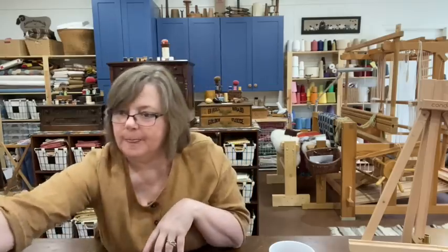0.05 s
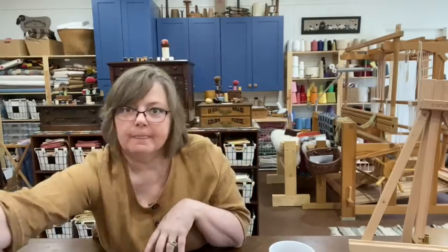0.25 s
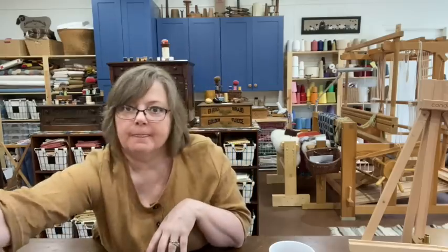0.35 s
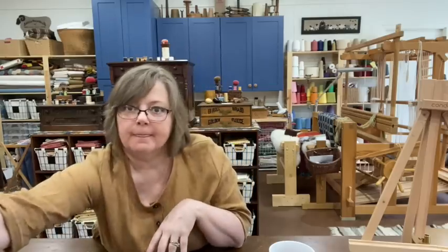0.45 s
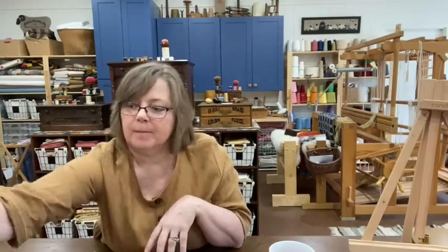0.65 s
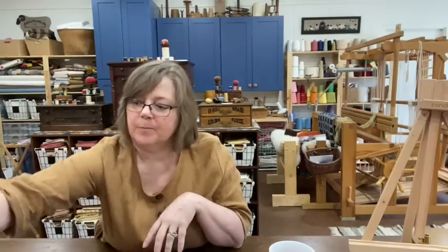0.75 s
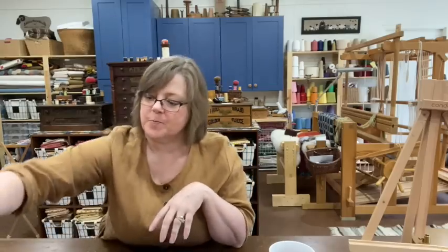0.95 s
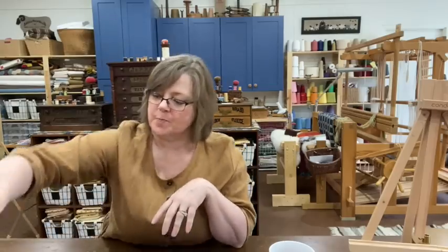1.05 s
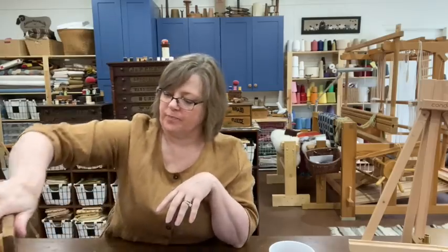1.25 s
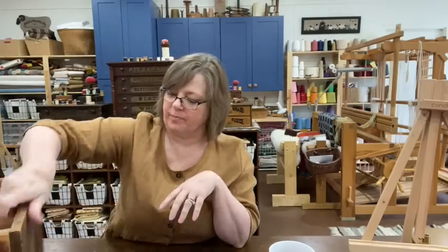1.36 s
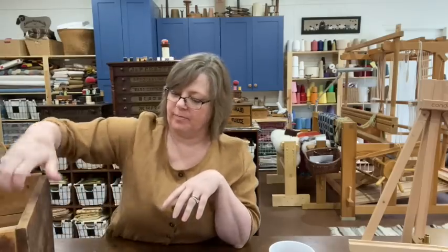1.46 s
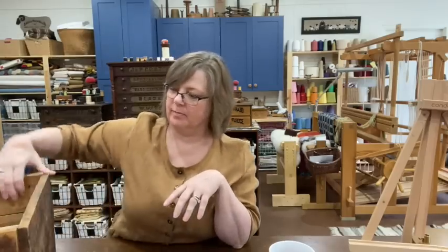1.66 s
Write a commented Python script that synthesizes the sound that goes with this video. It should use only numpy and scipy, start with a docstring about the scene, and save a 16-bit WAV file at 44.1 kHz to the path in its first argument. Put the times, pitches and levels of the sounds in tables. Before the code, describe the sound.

Wooden crate scraping and bumping over a tabletop, slats rattling, then stopping with small last knocks

```python
"""A wooden crate on a table, close to a stereo microphone pair and left of centre, in a small room; faint house rumble.
First it is grasped: dry cracks, short knocks and groaning slats, synthesized as decaying noise, tones and resonances.
Then it is nudged, and from about half a second dragged: irregular slips make the table boom, the slats rattle
and the rubbing faces rasp and hiss, while landing hops push thumps into the table top.
Near the end the rubbing dies down and last knocks ring out; the room answers throughout with decaying noise."""
import sys
import numpy as np
from scipy import signal
from scipy.fft import rfft, irfft, next_fast_len
from scipy.io import wavfile
from scipy.ndimage import uniform_filter1d, map_coordinates

SR = 44100
rng = np.random.default_rng(int(sys.argv[2]) if len(sys.argv) > 2 else 0)


def put_to_file(sound):
    """Save the sound as 16-bit audio at rate SR, in the file named by the first command-line argument."""
    columns = np.atleast_2d(sound).T  # one column per channel
    safe = np.clip(columns, -1, 1)
    whole_steps = np.round(safe * 32767)
    wavfile.write(sys.argv[1], SR, whole_steps.astype(np.int16))


N = 74970

# Resonances of the table top: f/Hz, width/Hz, relative level/dB
TABLE_MODES = [(71.5, 14.4, -9), (113, 15, 0), (175, 20, 2), (251, 50, -4.5), (290.6, 27.6, -3),
               (376.2, 46, -8.5)]
# Resonances of the crate's slats: f/Hz, width/Hz, relative level/dB
SLAT_MODES = [(423, 64, -3), (497, 41, 5), (546.3, 50, 2.5), (693, 120, -1.5), (840, 112, -2),
              (972, 61.4, -2.5), (1133, 75, -7), (1470, 334, -14.5), (1847, 180, -15.5)]
RATTLE_PER_S = 350  # mean slips per second that shake the slats


def amp(db):
    """Decibels to gain."""
    return 10 ** (np.asarray(db) / 20)


def unit(x):
    """Scaled to rms 1."""
    return x / np.sqrt(np.mean(x ** 2) + 1e-20)


def along(points, hz):
    """Value at each frequency, between (f/Hz, value) points on a log axis."""
    f, v = np.transpose(points)
    return np.interp(np.log(hz + 1), np.log(f + 1), v)


def filtered(x, response):
    """x passed through a complex response of frequency."""
    m = next_fast_len(N + SR // 2)
    spectrum = rfft(x, m) * response(np.fft.rfftfreq(m, 1 / SR))
    return irfft(spectrum, m)[..., :N]


def body(modes):
    """Causal response of a set of resonances; soft wood passes little treble."""
    low_hz, top_hz = 103, 2500

    def response(f):
        total = 0
        for k, (centre, width, db) in enumerate(modes):
            resonance = 1j * f * width / (centre * centre - f * f + 1j * f * width)
            total = total + (-1) ** k * amp(db) * resonance  # neighbours in opposite phase
        treble_loss = 1 / (1 + 1j * f / top_hz) ** 2
        bass_loss = 1j * f / (low_hz + 1j * f)
        return total * treble_loss * bass_loss

    return response


def patches(x, depth_db, size):
    """Random gain patches over time and frequency make the sound uneven."""
    z = signal.stft(x, nperseg=size)[2]
    field = rng.standard_normal(z.shape)
    field = uniform_filter1d(uniform_filter1d(field, 5, 0), 5, 1)
    return signal.istft(z * amp(depth_db * unit(field)), nperseg=size)[1][:N]


def slips(per_s, spread_db, smooth):
    """Friction: irregular slips of uneven size over a smooth rubbing noise."""
    happens = rng.random(N) < per_s / SR
    size = np.minimum(rng.exponential(size=N), 4)
    direction = np.sign(rng.standard_normal(N))
    jolts = happens * direction * amp(spread_db * size)
    return unit(unit(jolts) + smooth * rng.standard_normal(N))


def rumble():
    """A faint steady low rumble of the house: noise around one low frequency."""
    level_db, centre_hz = -53.5, 57.4

    def response(f):
        ratio = f / centre_hz
        return ratio ** 2 / (1 + ratio ** 4)

    return amp(level_db) * unit(filtered(rng.standard_normal(N), response))


def slats(force, grip):
    """The force rings lower, middle or higher tuned slats as the grip wanders between -1 and 1."""
    shift = 0.04  # largest share by which the tuning moves
    out = np.zeros(N)
    for k in (-1, 0, 1):
        share = np.sqrt(np.clip(1 - abs(grip - k), 0, 1))
        tuned = [(hz * (1 + k * shift), width, db) for hz, width, db in SLAT_MODES]
        out += filtered(force * share, body(tuned))
    return out


def wandering_grip():
    """The changing grip: a smooth random curve between -1 and 1."""
    shifts_per_s = 12
    points = rng.standard_normal(int(N * shifts_per_s / SR) + 4)
    return np.tanh(map_coordinates(points, [np.arange(N) * shifts_per_s / SR]))


def drag():
    """The slipping contact drives table, slats, rasp and hiss, each under its own level."""
    # Course of the drag: t/s, then level/dB of table boom, slat rattle, rasp of the rubbing faces, thin upper hiss
    drag_levels = [(0.0, -49, -57, -80, -65), (0.086, -55.5, -71, -78.5, -80),
                   (0.206, -33, -37.5, -44, -61.5), (0.291, -27.5, -31, -51, -52),
                   (0.335, -32, -47.5, -54.5, -84), (0.454, -44, -48, -45.5, -61),
                   (0.64, -29.5, -31.5, -43, -51.5), (0.68, -22.5, -34, -52.5, -62.5),
                   (0.78, -25, -26, -46, -58), (1.07, -23, -31, -48, -58.5),
                   (1.144, -28, -27.5, -46, -54.5), (1.216, -16.5, -36, -58, -55),
                   (1.314, -22, -26, -44, -51.5), (1.402, -30.5, -43, -59.5, -102),
                   (1.587, -65, -69, -108, -81.5), (1.61, -35.5, -58.5, -71.5, -69),
                   (1.7, -69, -67, -69.5, -62.5)]
    # Colour of the rasp: f/Hz, relative level/dB
    rasp_colour = [(880, -2.5), (1500, -6), (2090, -3.5), (2640, -3.5), (4210, -10.5), (5500, -23.5),
                   (7150, -60)]
    # Colour of the upper hiss: f/Hz, relative level/dB
    hiss_colour = [(2940, -18), (5000, -3), (12800, -8), (13800, -21), (14900, -61), (16000, -48)]
    judder_per_s, grit_per_s = 150, 3700  # mean slips per second
    lurch_db = 2.5  # a firmer grip presses the crate harder on the table

    s, *levels = np.transpose(drag_levels)
    boom, rattle, rasp, hiss = [amp(np.interp(np.arange(N) / SR, s, c)) for c in levels]
    grip = wandering_grip()
    boom = boom * amp(lurch_db * grip)
    rattle = rattle * amp(lurch_db * grip)

    judder = patches(slips(judder_per_s, 2, 1.0), 0.88, size=2048)
    shaking = patches(slips(RATTLE_PER_S, 3, 0.47), 3.43, size=1024)
    coarse_grit = patches(slips(grit_per_s, 4.9, 1.63), 4.0, size=512)
    fine_grit = patches(slips(grit_per_s, 1.7, 3.0), 2.2, size=512)
    layers = [(boom, judder, lambda x: filtered(x, body(TABLE_MODES))),
              (rattle, shaking, lambda x: slats(x, grip)),
              (rasp, coarse_grit, lambda x: filtered(x, lambda f: amp(along(rasp_colour, f)))),
              (hiss, fine_grit, lambda x: filtered(x, lambda f: amp(along(hiss_colour, f))))]
    # the level shapes the force, so resonances ring on; each layer is scaled by its steady loudness
    return sum(ring(level * force) / np.std(ring(force)) for level, force, ring in layers)


def groans():
    """Slips that for a moment excite mostly one slat, heard as a swelling groan."""
    # Groans: start t/s (below 0: already under way), length/s, level/dB, f/Hz
    groan_list = [(-.09, .18, -48, 860), (-.05, .15, -48, 385), (1.61, .04, -54, 850),
                  (1.6, .15, -62, 1570), (.49, 0.11, -40, 358), (0.496, 0.12, -40, 1075),
                  (0.707, 0.095, -26, 550), (0.9, 0.14, -33, 960), (1.135, 0.14, -24, 735)]
    width_share = 0.07  # resonance width as a share of the pitch
    t = np.arange(N) / SR
    out = np.zeros(N)
    for s, length, db, hz in groan_list:
        swell = np.sin(np.pi * np.clip((t - s) / length, 0, 1))
        one_slat = body([(hz, width_share * hz, 0)])
        out += amp(db) * swell * unit(filtered(slips(RATTLE_PER_S, 4.84, 0.62), one_slat))
    return out


def ticks():
    """Short dry cracks as the crate is grasped and breaks loose; each raps the slats."""
    # Cracks: t/s, level/dB from which the noise decays, brightness/dB an octave, peak level/dB of the slats' answer
    tick_list = [(.1115, -49, -12, -43), (.159, -31, -2, -38), (.1855, -25, -7, -27),
                 (.2385, -42, -12, -20.5), (.2685, -25, -9, -19), (.1862, -25, 4, -60)]
    t60, rise_s, bottom_hz, top_hz = 0.011, 0.0015, 1200, 13300
    damping, rap_top_hz = 2.5, 900  # a held slat rings shorter and duller

    out, t = np.zeros(N), np.arange(SR // 20) / SR
    hz = np.fft.rfftfreq(len(t), 1 / SR)
    held = body([(centre, damping * width, db) for centre, width, db in SLAT_MODES])
    wood = filtered(np.ones(1), lambda f: held(f) / (1 + 1j * f / rap_top_hz))[:len(t)]
    wood = wood / np.abs(wood).max()
    band = (hz > bottom_hz) / (1 + (hz / top_hz) ** 20)
    for s, db, tilt_db, wood_db in tick_list:
        tilt = amp(tilt_db * np.log2(hz / 4000 + 0.39))
        noise = unit(irfft(rfft(rng.standard_normal(len(t))) * band * tilt, len(t)))
        crack = amp(db - 60 * t / t60) * noise * np.minimum(t / rise_s, 1)
        out[round(s * SR):][:len(t)] += crack + amp(wood_db) * wood
    return out


def knocks():
    """One part of crate or table is rapped and rings on a main tone and a weaker one about half an octave lower."""
    # Knocks: t/s, level/dB from which the main tone decays, f/Hz of that tone, t60/s
    knock_list = [(.112, -47, 2300, .02), (.186, -27, 1400, .02), (.1865, -28, 2250, .02),
                  (.191, -26, 490, .04), (.325, -24, 52, .2), (.577, -36, 1700, .03), (.6, -28, 58, .2),
                  (.652, -13, 1000, .04), (.657, -14, 860, .05), (1.0132, -18.5, 1570, .035),
                  (1.445, -33, 80, .4), (1.598, -38, 355, .3), (1.6155, -29.5, 113, .2)]
    rise_s = 0.00024
    out, t = np.zeros(N + SR), np.arange(SR // 5) / SR
    for s, db, hz, t60 in knock_list:
        main = np.sin(2 * np.pi * hz * t)
        lower = 0.35 * np.sin(2 * np.pi * 0.7 * hz * t + rng.uniform(-0.039, 1))
        envelope = amp(db - 60 * t / t60) * (1 - np.exp(-t / rise_s))
        out[round(s * SR):][:len(t)] += envelope * (main + lower)
    return out[:N]


def thumps():
    """The crate hops and lands: soft pushes ring the table top."""
    # Landings: t/s of the deepest swing, peak level/dB
    thump_list = [(0.269, -17), (0.279, -14), (.293, -10.5), (0.322, -17), (0.394, -22.5), (0.94, -16.5),
                  (0.959, -10), (.976, -13.5), (1.037, -13.5), (1.054, -17.5), (1.063, -9), (1.194, -10),
                  (1.213, -16), (1.222, -22), (1.309, -12.5), (1.333, -12.5), (1.355, -12.5)]
    push_s = 0.0016  # time from first contact to the hardest push
    t = np.arange(N) / SR
    ring = filtered(t * np.exp(-t / push_s), body(TABLE_MODES))[:SR // 3]
    top = np.abs(ring).argmax()
    out = np.zeros(N + SR)
    for s, db in thump_list:
        out[round(s * SR) - top:][:len(ring)] -= amp(db) * ring / ring[top]
    return out[:N]


def room(x):
    """The answer is a diffuse decaying noise, renewed in overlapping stretches; each frequency dies at its own speed."""
    # Decay of the room: f/Hz, t60/s
    decay_times = [(100, 0.064), (1000, 0.42), (10000, 0.41)]
    # Strength of the room: f/Hz, level over the sound sent in/dB
    wet_levels = [(60, -84), (200, -8.5), (500, -6), (2000, 5.5), (12000, 0)]
    out, hop = np.zeros((2, N + 2 * SR)), SR // 20
    delay = 200  # samples before the answer begins
    x = np.pad(x, (hop, 2 * hop))
    for start in range(0, N + hop, hop):  # a new random tail for each overlapping stretch
        hz, t, z = signal.stft(rng.standard_normal((2, SR // 2)), SR, nperseg=256)
        t60 = along(decay_times, hz)[:, None]
        decay = amp(along(wet_levels, hz)[:, None] - 60 * t / t60)
        energy = np.sqrt(t60 * SR / (2 * np.log(1000)))  # a long tail is no louder in sum
        tail = signal.istft(z * decay / energy, SR, nperseg=256)[1]
        stretch = x[start:start + 2 * hop] * np.hanning(2 * hop)
        wet = signal.fftconvolve(stretch[None], tail, axes=1)
        out[:, start:start + wet.shape[1]] += wet
    return out[:, hop - delay:][:, :N]


def scene():
    """The crate reaches the left microphone port first; the room adds its answer."""
    # Balance of the pair: f/Hz, left over right level/dB
    left_levels = [(60, 0), (180, -0.5), (550, 3), (1650, 11), (4970, 2)]
    # Phase of the pair: f/Hz, lead of the left port/radians
    lead_phase = [(0, 0.28), (860, 1.56), (2070, 2.55), (3450, 5.87), (4820, 7.08), (12500, 8.4)]
    blows_wet_db = -7  # ticks and knocks reach the room weaker than the rubbing does
    rub = drag() + thumps() + groans()
    blows = ticks() + knocks()
    half = np.array([[.5], [-.5]])  # half of each difference to the left, half to the right

    def pair(f):
        lead = np.interp(f, *np.transpose(lead_phase))
        return amp(half * along(left_levels, f)) * np.exp(1j * half * lead)

    direct = filtered(rub + blows, pair)
    return direct + room(rub + amp(blows_wet_db) * blows) + rumble()


def record(dry):
    """Stereo width varies over the treble; the deep bass is rolled off and nothing is kept above the band limit."""
    # Stereo width: f/Hz, gain of left minus right/dB
    side_gain = [(6800, 1), (6900, -41), (11800, -21), (12600, -3), (15300, 22), (15800, -24)]
    low_hz, top_hz = 32, 16400
    mid = (dry[0] + dry[1]) / 2
    side = filtered((dry[0] - dry[1]) / 2, lambda f: amp(along(side_gain, f)))
    stereo = np.array([mid + side, mid - side])
    return filtered(stereo, lambda f: (f < top_hz) * (1j * f / (low_hz + 1j * f)) ** 2)


dry = scene()
out = record(dry)
put_to_file(out)
```